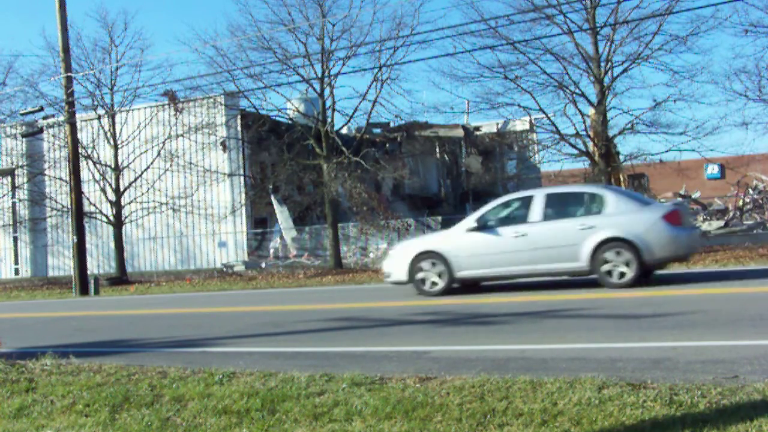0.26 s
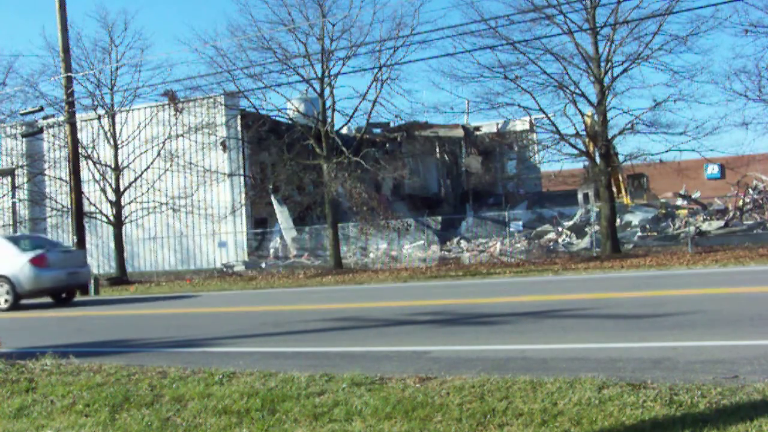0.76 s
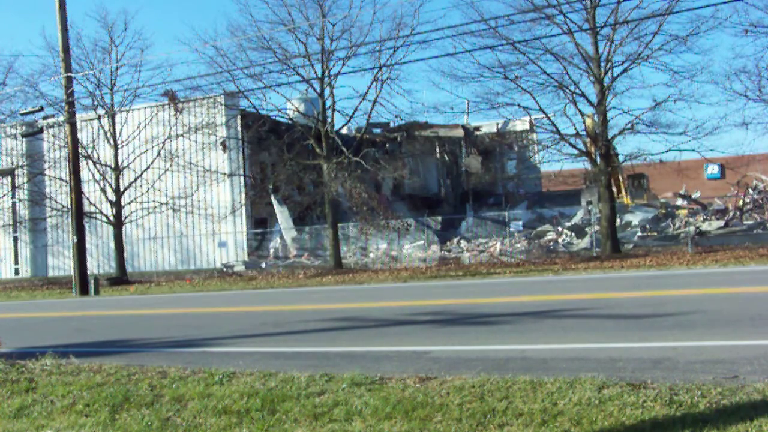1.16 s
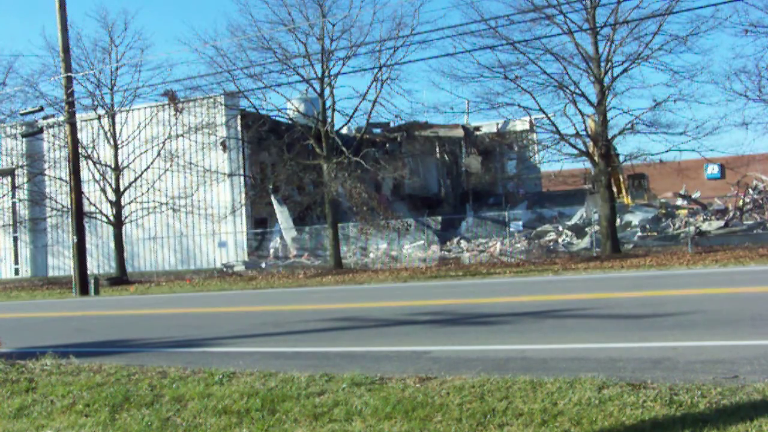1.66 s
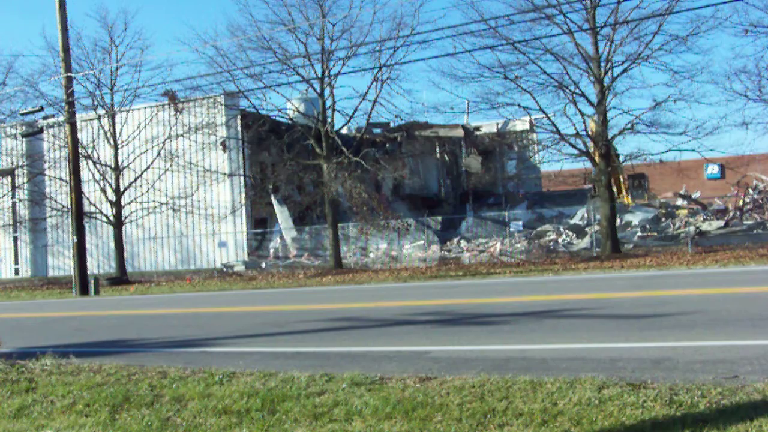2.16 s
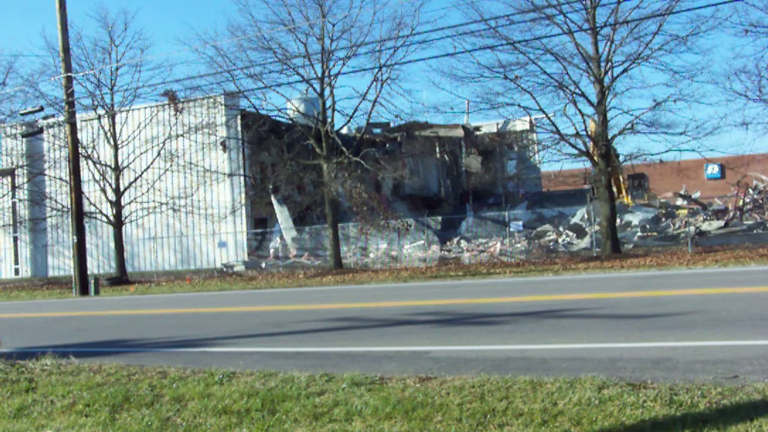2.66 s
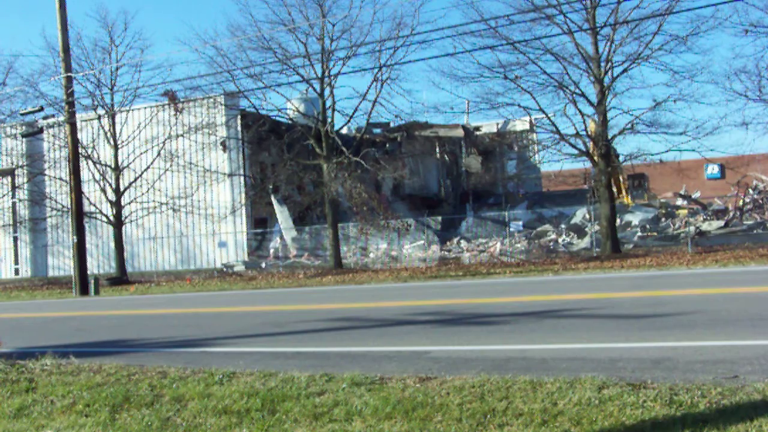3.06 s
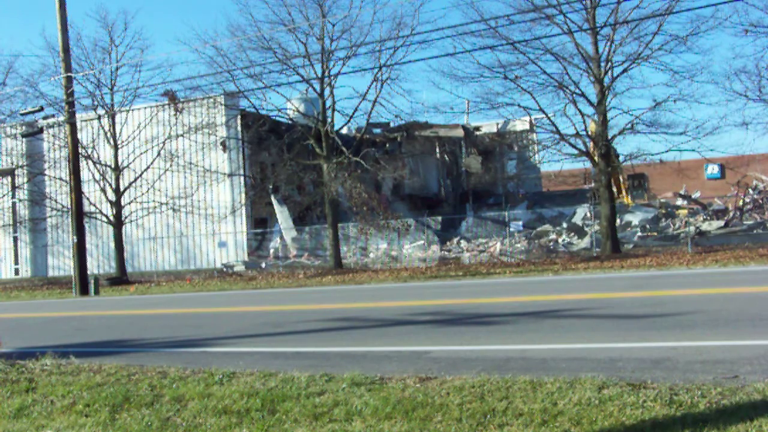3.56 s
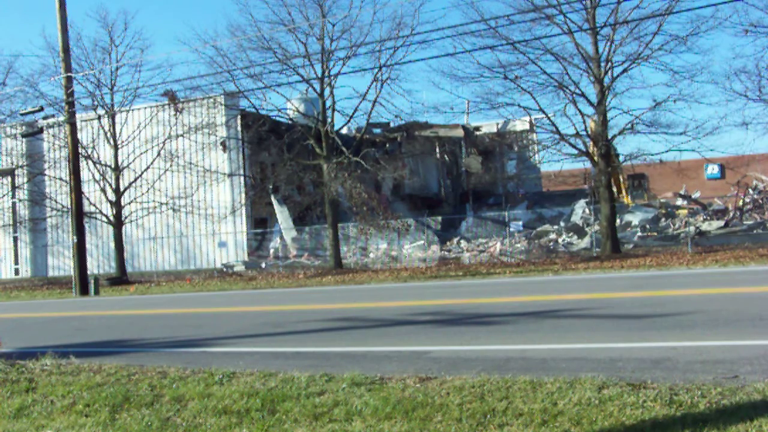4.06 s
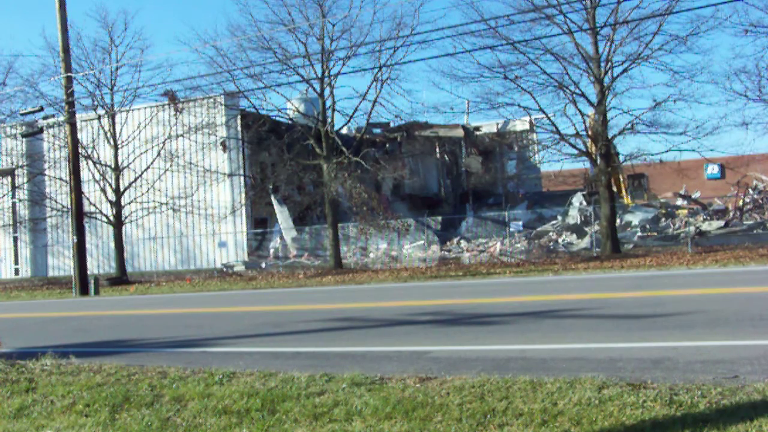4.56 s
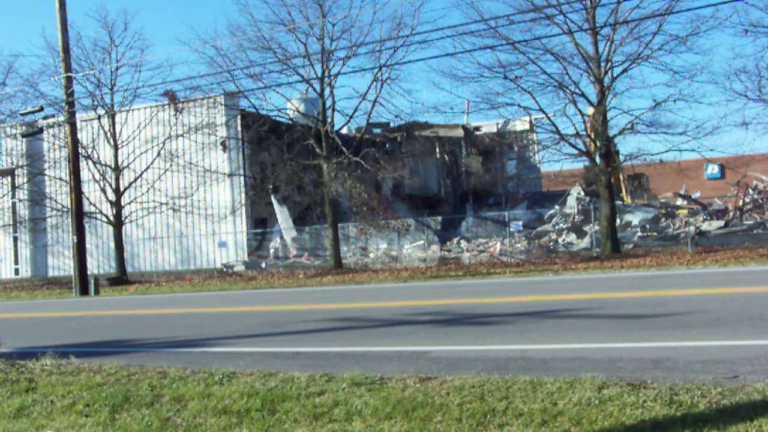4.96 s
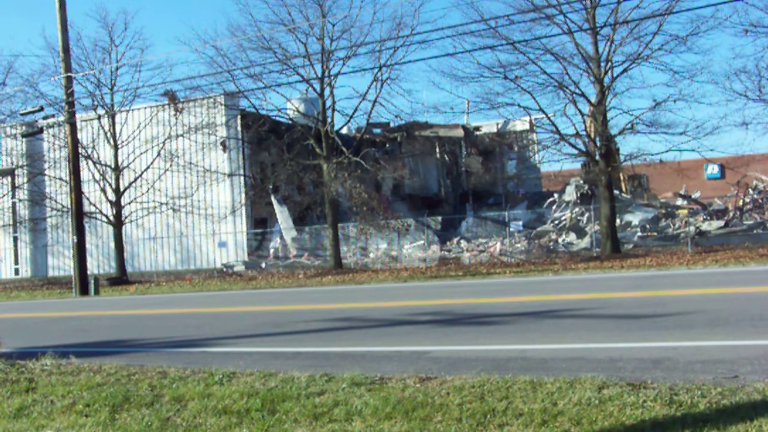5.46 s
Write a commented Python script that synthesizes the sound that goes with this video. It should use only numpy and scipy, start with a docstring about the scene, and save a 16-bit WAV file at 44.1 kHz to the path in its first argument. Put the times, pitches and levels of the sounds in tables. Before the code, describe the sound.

Outdoors, across a road from a demolition site, tyre noise swells and fades as a car drives by. Brick and timber then crunch, snap and tumble irregularly over a low rumble and an excavator's diesel hum. A high steel squeal cuts in, followed later by a cluster of bright metal clangs and two quick squeaks as the debris thins. Walls add a short tail, and nearly everything is heard on the right.

```python
"""A demolition site across a road. An excavator tears into a building over the throb of its diesel:
rubble crunches and slides as countless tiny collisions, slabs knock, sheet steel rattles, and steel
dragged over steel squeals. A car drives past in the first second on a roar of tyres.
Walls add a short tail and one close echo, and the ground reflection hollows the low mids of everything.
The sound sits almost wholly on the right."""
import sys
import numpy as np
from scipy import signal
from scipy.fft import rfft, irfft
from scipy.io import wavfile
from scipy.ndimage import map_coordinates

SR = 44100
rng = np.random.default_rng(int(sys.argv[2]) if len(sys.argv) > 2 else 0)


def to_wav(sig):
    """Store sig (one row per channel, or 1-D mono) as 16-bit WAV at the path in sys.argv[1].

    Samples outside -1..1 are clipped; the rate is SR.
    """
    pcm = np.clip(np.atleast_2d(sig), -1, 1) * 32767
    pcm = np.round(pcm).astype(np.int16)
    wavfile.write(sys.argv[1], SR, pcm.T)  # frames by channels


N = 252384
T = np.arange(N) / SR
FREQS = np.fft.rfftfreq(N, 1 / SR)
BAND_HZ = 400 * 2 ** (np.arange(14) / 3)  # third-octave centres


def undb(db):
    """Decibels to gain."""
    return 10 ** (np.asarray(db) / 20)


def unit(x):
    """Scale to rms 1."""
    return x / np.sqrt(np.mean(x ** 2))


def curves(table):
    """Turn each column of a timed table into a sample-by-sample curve."""
    times, *columns = np.transpose(table)
    return [np.interp(T, times, column) for column in columns]


def shape(x, gain):
    """Filter with a gain for every frequency."""
    return irfft(rfft(x) * gain, N)


def colour(x, points):
    """EQ through (Hz, dB) points."""
    hz, db = np.transpose(points)
    return shape(x, undb(np.interp(np.log(FREQS + 1), np.log(hz), db)))


def noise(points):
    """Noise at rms 1, coloured by (Hz, dB) points."""
    return unit(colour(rng.standard_normal(N), points))


def walk(rate):
    """Smooth random wander at rms 1, through `rate` random points a second."""
    knots = rng.standard_normal(4096)
    return unit(map_coordinates(knots, [T * rate], order=3, mode="wrap"))


def bands(x):
    """Split into third-octave bands that add up to the whole."""
    lowpasses = [1 / np.sqrt(1 + (FREQS / hz) ** 12) for hz in BAND_HZ[:-1] * 2 ** (1 / 6)]
    edges = [0] + lowpasses + [1]
    spectrum = rfft(x)
    return np.array([irfft(spectrum * (upper - lower), N) for lower, upper in zip(edges, edges[1:])])


def bell(offset, width):
    """A bell curve that peaks at 1 where the offset is zero."""
    return np.exp(-.5 * (offset / width) ** 2)


def hump(centre_hz, octaves):
    """A bell-shaped weight for each band."""
    return bell(np.log2(BAND_HZ[:, None] / centre_hz), octaves)


def reverb(x, t60_s, wet_db):
    """Add scattered reflections: a tail of dying noise that starts 12 ms late."""
    t = T[:SR]
    tail = rng.standard_normal(SR) * np.exp(-np.log(1000) * t / t60_s) * (t > .012)
    return x + undb(wet_db) * signal.oaconvolve(x, tail / np.linalg.norm(tail))[:N]


def wall_echo(x, lag_s=.00508, echo_db=-18.5):
    """A wall beside the work throws back one close echo, which combs the spectrum."""
    return shape(x, 1 + undb(echo_db) * np.exp(-2j * np.pi * FREQS * lag_s))


# The hollows in the tone. Each row: centre in Hz, width in Hz, gain in dB.
GROUND_NOTCHES = [(315.7, 49.7, -13.5), (541, 24, -6), (712, 22, -4), (961, 23, -6.5)]

def ground_reflection(x):
    """The bounce off the ground partly cancels the direct sound at a few frequencies."""
    notches_db = sum(db * bell(FREQS - hz, width_hz) for hz, width_hz, db in GROUND_NOTCHES)
    return shape(x, undb(notches_db))


# The tone of the background bed. Each row: frequency in Hz, relative level in dB.
RUMBLE_SPECTRUM = [(20, -21), (40, -16), (65, -5), (110, 0.5), (170, -7.5), (240, -4.5), (450, -17.5),
                   (800, -13.5), (1500, -15), (3000, -14), (7000, -32)]
# Its fader moves. Each row: time in seconds, level in dB.
RUMBLE_LEVEL = [(0, -31), (1.2, -34.5), (2.6, -35.5), (3.9, -30.5), (4.5, -34.5), (5.72, -36)]

def rumble():
    """Site and road lay down a bed of low noise that slowly swells and sinks."""
    return noise(RUMBLE_SPECTRUM) * undb(curves(RUMBLE_LEVEL)[0])


# The diesel under changing load. Each row: time in seconds, cycle rate in Hz, level in dB.
DIESEL_LOAD = [(0, 51.94, -50), (1.0, 52.68, -45), (2.3, 52.1, -39.5), (3.0, 50, -46), (3.85, 49.7, -42.5),
               (4.15, 46.31, -41.5), (4.6, 46.56, -41), (4.8, 54.5, -46), (5.72, 55.5, -47.5)]
# Its harmonics. Each row: multiple of the cycle rate, relative level in dB.
DIESEL_ORDERS = [(2, -3), (3, -1.5), (4, -12.5)]

def diesel(waver=0.00944, throb_db=2.5):
    """The excavator's engine hums on three low harmonics, each throbbing unevenly."""
    hz, db = curves(DIESEL_LOAD)
    phase = 2 * np.pi * np.cumsum(hz * (1 + waver * walk(20))) / SR
    hum = sum(undb(order_db + throb_db * walk(14)) * np.sin(k * phase) for k, order_db in DIESEL_ORDERS)
    return undb(db) * unit(hum)


# The rush of tyres on the road. Each row: frequency in Hz, relative level in dB.
TYRE_SPECTRUM = [(100, -14), (250, -13), (450, -5), (800, -3), (1500, -5.5), (2500, -9.5), (4000, -12),
                 (7000, -21)]
# The drone of the car's engine. Each row: frequency in Hz, relative level in dB.
CAR_ENGINE_SPECTRUM = [(100, -11.5), (250, -3.5), (450, 1), (750, -3.5), (1200, -14.5), (4000, -35)]

def car(passes_s=0.46, speed_m_s=16.8, lane_m=14.3, tyre_db=-30, engine_db=-27, resonance_db=12.3):
    """A pass-by: as the car draws level its tread resonance climbs and its engine turns away."""
    along_m = speed_m_s * (T - passes_s)
    distance_m = np.hypot(along_m, lane_m)
    climb = .5 + .5 * np.tanh((along_m + 3) / 3.5)  # steepest 3 m before it draws level
    coming_hz, going_hz = 990, 1450
    resonance = hump(coming_hz + (going_hz - coming_hz) * climb, octaves=0.48)
    tread = bands(noise(TYRE_SPECTRUM))
    flutter_db = 1.1 * np.array([walk(18) for _ in BAND_HZ])
    roar = np.sum(tread * undb(resonance_db * resonance + flutter_db), axis=0)
    facing = (.5 - .5 * along_m / distance_m) ** 2
    engine = noise(CAR_ENGINE_SPECTRUM) * facing
    nearness = lane_m / distance_m  # also the cosine of the bearing
    focus = nearness ** 1.85  # what is straight ahead is heard best
    return (roar * undb(tyre_db) + engine * undb(engine_db)) * nearness * focus


# Steel dragged over steel. Each row: start in seconds, length in seconds, pitch in Hz, level in dB,
# level of the octave against the note in dB.
SQUEALS = [(2.13, 0.095, 2070, -34, -27), (2.215, 0.19, 2048, -27, -30), (5.25, 0.049, 1750, -28, -10),
           (5.354, .05, 1770, -36, -10)]

def squeals(waver=0.00545, rough_db=1.8, slip_rate=170):
    """Sticking and slipping steel sings on one unsteady note and its octave."""
    out = 0
    drift = 1 + waver * walk(slip_rate)
    for start, length, hz, db, octave_db in SQUEALS:
        phase = 2 * np.pi * np.cumsum(hz * drift) / SR
        progress = np.clip((T - start) / length, 0, 1)
        pressure = np.sqrt(np.maximum(np.sin(np.pi * progress), 0))
        out = out + undb(db) * pressure * (np.sin(phase) + undb(octave_db) * np.sin(2 * phase))
    return out * undb(rough_db * walk(slip_rate))


# Pieces striking sheet steel. Each row: start in seconds, ring in Hz, level in dB.
CLANGS = [(3.787, 3850, -28), (3.888, 3530, -29), (4.036, 3610, -25.5), (4.14, 3670, -29),
          (4.615, 3650, -31), (5.55, 3550, -44)]

def clangs(width_hz=130, attack_s=.003, decay_s=0.053):
    """Struck sheet steel rattles in a cluster of close modes, played as narrow, fast-dying noise."""
    out = 0
    for start, hz, db in CLANGS:
        cluster = unit(shape(rng.standard_normal(N), bell(FREQS - hz, width_hz)))
        age = np.maximum(T - start, 0)
        out = out + undb(db) * cluster * np.minimum(age / attack_s, 1) * np.exp(-age / decay_s)
    return out


# The bucket grinding through the heap. Each row: time in seconds, gain at 2 kHz in dB.
GRIND = [(0, -36), (1.05, -34.5), (1.22, -29), (2.05, -29.5), (2.22, -33), (2.7, -32.5), (3.1, -28.5),
         (4.05, -27.5), (4.52, -34), (5.72, -34.5)]
# Loads of rubble sliding down. Each row: start in seconds, length in seconds, gain at 2 kHz in dB,
# brightness in dB per octave.
SLIDES = [(1.355, .11, -26.5, 2), (1.55, 0.19, -25.5, 1), (1.893, 0.17, -24.5, 0.4),
          (2.389, 0.087, -30.5, -0.5), (2.757, 0.088, -30, 2), (2.856, 0.14, -24.5, 1.1),
          (3.145, 0.063, -27, 3), (3.36, .11, -27, 1.8), (3.619, 0.1, -25, 0), (3.785, 0.097, -22.5, 0),
          (4.08, .23, -24, 1), (4.61, 0.087, -33.5, 0), (5.05, 0.069, -33.5, -0.5), (5.46, .1, -36, 0)]

def crunch(grind_tilt_db=-0.07, attack_s=0.042, release_s=0.067, spurt_db=1.0, spurt_rate=35):
    """Band gains of rubble grinding on in uneven spurts; each slide swells, runs and dies over it."""
    octaves = np.log2(BAND_HZ[:, None] / 2000)
    power = undb(curves(GRIND)[0] + grind_tilt_db * octaves) ** 2
    for start, length, db, tilt_db in SLIDES:
        swell = np.clip((T - start) / attack_s, 0, 1)
        fade = np.exp(-np.maximum(T - start - length, 0) / release_s)
        power = power + (undb(db + tilt_db * octaves) * swell * fade) ** 2
    return np.sqrt(power) * undb(spurt_db * walk(spurt_rate))


# Breaks and falling pieces. Each row: start in seconds, gain in dB,
# centre in Hz (low for slabs, high for splinters), width in octaves.
BREAKS = [(1.108, -15.5, 3400, 2.2), (1.217, -19, 410, .15), (1.407, -17.3, 4400, 0.52),
          (1.631, -14.5, 3770, .38), (1.658, -19, 2500, 1.2), (1.757, -18.5, 2300, 0.34),
          (1.86, -22.5, 473, .25), (1.948, -17.5, 7000, 0.58), (2.321, -16.5, 655, 0.66),
          (2.322, -24.5, 4370, 0.87), (2.875, -18.5, 1400, 2.5), (2.975, -23, 2500, 0.44),
          (3.068, -18, 6000, 1.15), (3.214, -14.8, 4680, .4), (3.314, -22, 900, 3.1),
          (3.396, -19.5, 5000, 0.77), (3.432, -20, 950, 0.43), (3.782, -17.5, 4000, 1.25),
          (3.835, -16.5, 1300, 1.4), (3.95, -22, 3400, 1.6), (4.028, -15.5, 3099, 2.06),
          (4.096, -22, 4500, 1.8), (4.13, -18, 3000, 1.2), (4.183, -20, 1900, 1.2),
          (4.427, -24.5, 5500, 2.1), (4.606, -19.5, 5000, 1.2), (4.709, -19.5, 2798, 0.38),
          (5.243, -27, 5906, 1.9), (5.294, -17.5, 7700, .5), (5.399, -29, 820, .8)]

def breaks(rise_s=0.0083, hold_s=0.011, decay_s=0.024):
    """Band gains of the burst of fragments that each break lets go; the bursts add as power."""
    power = np.zeros((len(BAND_HZ), N))
    for start, db, centre_hz, octaves in BREAKS:
        span = slice(int(start * SR), int(start * SR) + SR // 2)
        age = np.maximum(T[span] - start, 0)
        burst = np.minimum(age / rise_s, 1) * np.exp(-np.maximum(age - rise_s - hold_s, 0) / decay_s)
        power[:, span] += (undb(db) * hump(centre_hz, octaves) * burst) ** 2
    return np.sqrt(power)


def fragments(hits_per_s=8000, spread_db=2.5, click_s=0.00053, ring_s=0.0014, ring_mix=0.51, sizes=40):
    """Countless small collisions: each size of fragment gives a click and a brief ring at its own pitch."""
    t, out = T[:1024], 0
    for hz in np.geomspace(500, 7500, sizes):
        hits = (rng.random(N) < hits_per_s / sizes / SR) * rng.choice([-1, 1], N)
        strengths = undb(spread_db * np.minimum(rng.exponential(size=N), 3.5))
        click = rng.standard_normal(len(t)) * np.exp(-t / click_s)
        ring = np.sin(2 * np.pi * hz * t) * np.exp(-t / ring_s)
        impact = unit(click) + ring_mix * np.sqrt(hz / 3000) * unit(ring)
        out = out + signal.oaconvolve(hits * strengths, impact)[:N]
    return unit(out)


# The EQ on the colliding debris. Each row: frequency in Hz, relative gain in dB.
RUBBLE_EQ = [(150, -6), (400, -2.5), (750, 3.5), (1300, 2.5), (2200, -1), (3500, -4.5), (5000, -8),
             (7000, -14.5)]

def rubble():
    """Brick, block and timber colliding, driven by the grinding, the slides and the breaks."""
    grit = unit(colour(fragments(), RUBBLE_EQ))
    return np.sum(bands(grit) * np.hypot(crunch(), breaks()), axis=0)


def scene():
    """The work among the standing walls, the diesel and the car, all coloured by the ground bounce."""
    bed = rumble()
    work = reverb(rubble() + clangs() + squeals(), t60_s=0.34, wet_db=-15)
    mix = wall_echo(work + bed) + diesel() + car()
    return np.tile(ground_reflection(mix), (2, 1))


def record(dry):
    """The sound sits right, peaks rounded; the left has a faint blur and hiss. The top is cut off."""
    blur = reverb(dry[0], t60_s=.06, wet_db=11.5) * undb(-44)
    hiss = noise(TYRE_SPECTRUM) * undb(-54.5)  # steady, in the same colour as the tyres
    left, right = blur + hiss, np.tanh(2 * dry[1])
    treble_rolloff = [(7250, -0.5), (7900, -16), (8900, -26.5)]  # Hz, dB
    channels = np.array([colour(x, treble_rolloff) for x in (left, right)])
    lowpass = signal.ellip(10, .2, 90, 8800, fs=SR, output="sos")
    return signal.sosfilt(lowpass, channels)


dry = scene()
out = record(dry)
to_wav(out)
```